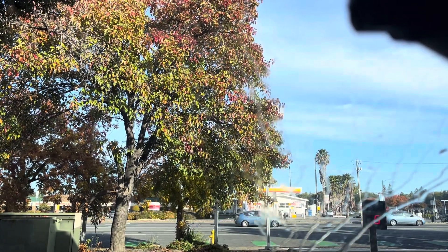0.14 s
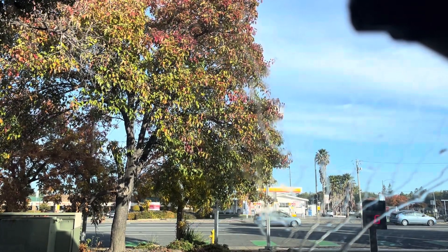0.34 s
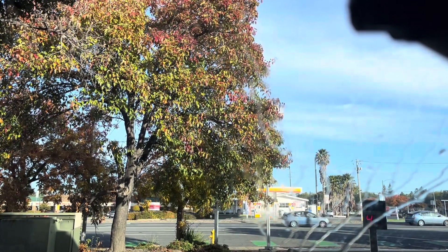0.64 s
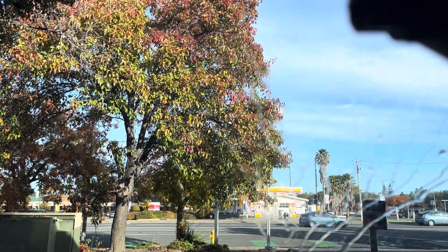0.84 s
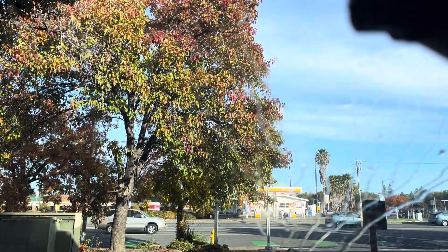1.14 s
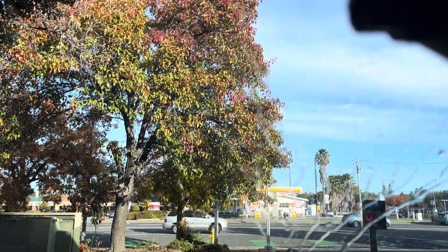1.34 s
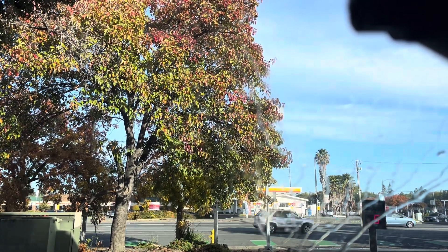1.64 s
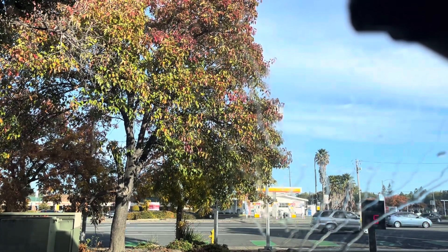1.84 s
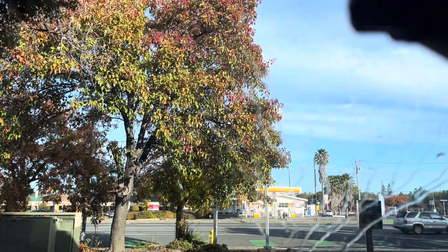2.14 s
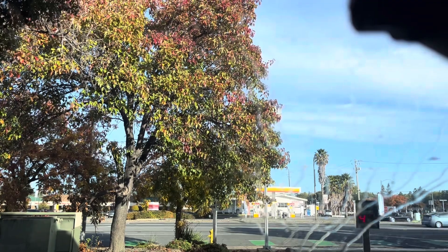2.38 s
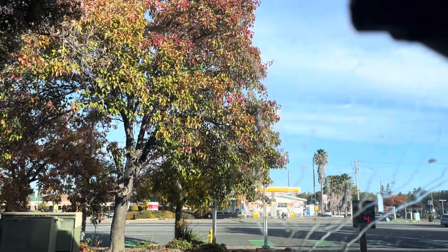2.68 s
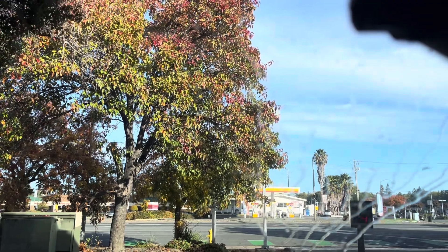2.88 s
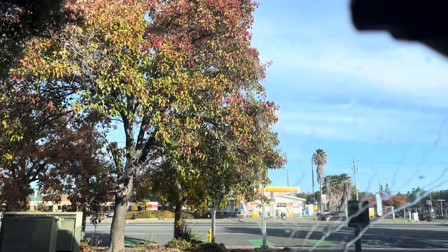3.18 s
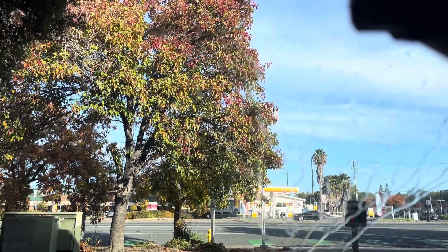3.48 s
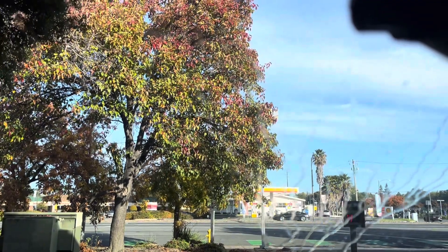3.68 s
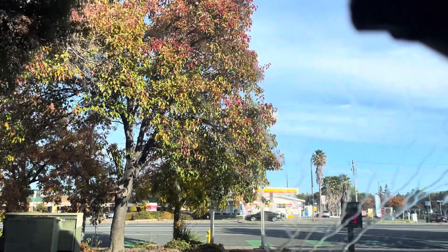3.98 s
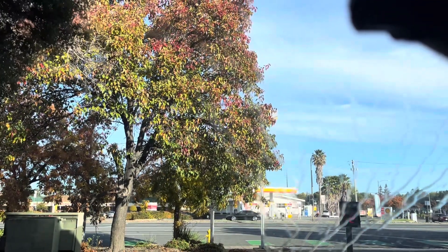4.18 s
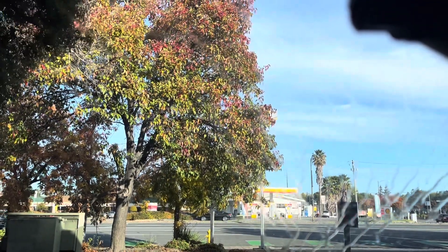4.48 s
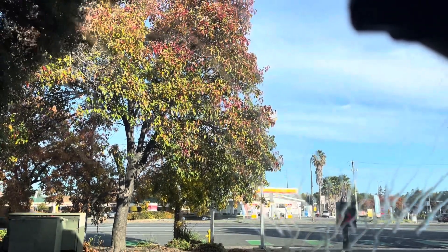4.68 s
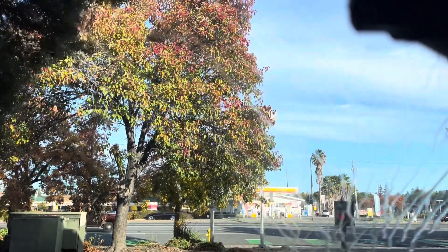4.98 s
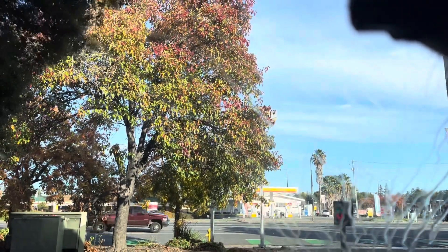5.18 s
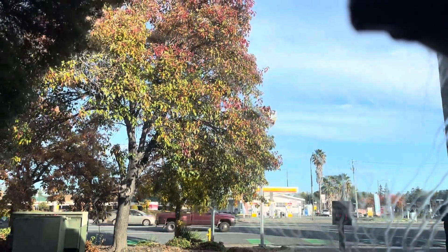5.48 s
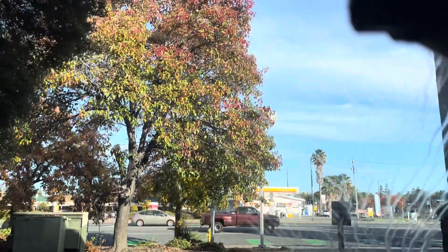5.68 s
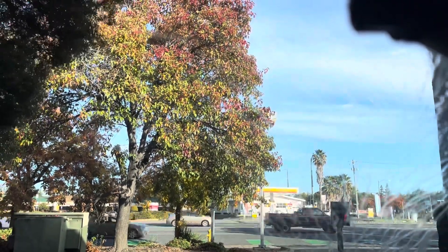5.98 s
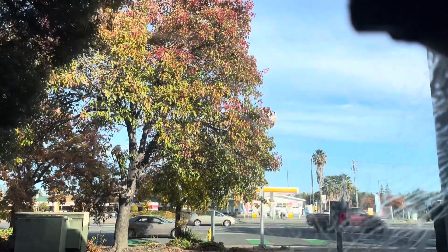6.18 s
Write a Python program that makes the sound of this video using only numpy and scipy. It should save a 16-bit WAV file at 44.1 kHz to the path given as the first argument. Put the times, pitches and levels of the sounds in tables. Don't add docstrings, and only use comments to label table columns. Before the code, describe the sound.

Inside a closed car, heavy dryer blowers drum on the roof with a low roar and rushing air, then move back into a deep cabin boom.

```python
import sys
import numpy as np
from scipy import signal
from scipy.fft import rfft, irfft, next_fast_len
from scipy.io import wavfile

SR = 44100
rng = np.random.default_rng(int(sys.argv[2]) if len(sys.argv) > 2 else 0)


def wav_out(sig):
    wavfile.write(sys.argv[1], SR, np.round(np.clip(np.atleast_2d(sig).T, -1, 1) * 32767).astype(np.int16))


def makeup_ratio(level_db):
    decades = np.asarray(level_db, float) / 20
    return 10 ** decades


N = 279153
SECONDS = np.arange(N) / SR
SIZE = next_fast_len(N)
HZ = np.maximum(np.fft.rfftfreq(SIZE, 1 / SR), 1)


def rms_one(x):
    return x / np.sqrt(np.mean(x ** 2) + 1e-20)


def over_pitch(hz, values):
    return np.interp(np.log(HZ), np.log(hz), values)


def drift(rate_hz):
    step = 40
    pole = np.exp(-2 * np.pi * rate_hz * step / SR)
    noise = rng.standard_normal(N // step + 2002)
    slow = signal.lfilter([1], [1, -2 * pole, pole ** 2], noise)[2000:]
    return np.interp(np.arange(N) / step, np.arange(len(slow)), rms_one(slow))


def by_place(roof_db, behind_db):
    # start_s, place (0 = over the roof, 1 = behind the cabin)
    strike = [
        (0, 0.018),
        (1.0, .15),
        (2.3, 0.2),
        (3.0, 0.33),
        (3.7, .65),
        (4.3, 1.046),
        (5.3, 0.98),
        (6.33, .95),
    ]
    start_s, place = np.transpose(strike)
    return roof_db + (behind_db - roof_db) * np.interp(SECONDS, start_s, place)


def surges():
    # peak_s, boom_db, rear_panels_db
    swells = [
        (2.5, 2.5, 1.5),
        (4.5, 3, 0.5),
        (5.85, 3, 1.8),
        (6.3, 3.5, 2.5),
    ]
    half_width_s = 0.25
    peak_s, *extra_db = np.transpose(swells)
    bells = np.exp(-((SECONDS - peak_s[:, None]) / half_width_s) ** 2)
    return np.dot(extra_db, bells)


def cabin_gain():
    # centre_hz, width_hz, boost_db
    resonances = [(40, 8, 2), (58, 8, 2.5), (73, 9, 2.5), (150, 18, 2.2), (180, 12, 4.5), (207, 12, 3),
                  (250, 22, 2.2), (440, 40, 2.4), (725, 70, 3.2), (1390, 65, 4.2), (2400, 85, 2.4),
                  (2680, 125, 4.2), (2900, 105, 4.2)]
    return makeup_ratio(sum(db / (1 + (2 * (HZ - hz) / width) ** 2) for hz, width, db in resonances))


def at_ports(shared, own_left, own_right):
    # pitch_hz, likeness (0-1), left_lead_rad, left_minus_right_db
    ports = [(45, .995, .03, .3), (100, .9, .25, 1.3), (300, .78, 0., .8), (420, .4, .5, 2.2),
             (560, .15, 2.2, 2.5), (1200, .4, 3.5, .5), (1620, .55, 3.6, -1.5), (1720, .75, 6.7, 3.5),
             (2700, .75, 7.1, 2.2), (3600, .36, 7.4, 4.6), (5100, .4, 7.0, 5.2), (8300, .9, 3.14, 0.),
             (11800, .95, 0., 0.), (15000, .9, -3., 0.)]
    hz, *columns = np.transpose(ports)
    alike, lead, balance_db = [over_pitch(hz, column) for column in columns]
    alike = np.clip(alike, 0, 1)
    together, apart = np.sqrt(alike) * shared, np.sqrt(1 - alike)
    left = together * np.exp(0.5j * lead) + apart * own_left
    right = together * np.exp(-0.5j * lead) + apart * own_right
    return np.array([left * makeup_ratio(balance_db / 2), right * makeup_ratio(-balance_db / 2)])


def turbulence(colour, level_db, gust_db, gust_hz):
    hz, db = np.transpose(colour)
    inside = (HZ > hz[0]) * (HZ < hz[-1])
    path = makeup_ratio(over_pitch(hz, db)) * inside
    white = rfft(rng.standard_normal((3, SIZE)))
    spectrum = at_ports(*white) * path * cabin_gain()
    noise = rms_one(irfft(spectrum, SIZE)[:, :N])
    return noise * makeup_ratio(level_db + gust_db * drift(gust_hz))


def whistles():
    # pitch_hz, width_hz, roof_db, behind_db
    gaps = [
        (731, 16, -54.5, -64),
        (2700, 35, -65.5, -66),
        (2925, 35, -66, -66.5),
        (1400, 28, -71.5, -61),
        (9450, 40, -83, -87.5),
        (9780, 15, -85, -92),
    ]
    out = np.zeros(N)
    for hz, width_hz, roof_db, behind_db in gaps:
        turn = 2 * np.pi * hz * SECONDS
        tone = drift(width_hz) * np.sin(turn) + drift(width_hz) * np.cos(turn)
        out += makeup_ratio(by_place(roof_db, behind_db)) * tone
    return out


def ticks():
    # start_s, peak_db, centre_hz, width_octaves, t60_s
    drops = [
        (.5300, -37, 900, 1.1, .04),
        (.7533, -49, 4800, 1.0, .06),
        (.7533, -57, 10900, .22, .08),
        (2.4559, -49, 12400, .5, .035),
        (2.4559, -59, 6600, .9, .03),
    ]
    pan_db = 2.5
    pan = makeup_ratio([[pan_db / 2], [-pan_db / 2]])
    out, t = np.zeros((2, N)), np.arange(SR // 10) / SR
    for start_s, peak_db, hz, octaves, t60 in drops:
        mid, side = rng.standard_normal((2, len(t)))
        edges_hz = np.clip(hz * 2 ** (np.array([-0.5, 0.5]) * octaves), 20, 0.45 * SR)
        band = signal.butter(2, edges_hz, "band", fs=SR, output="sos")
        burst = signal.sosfilt(band, [mid + 0.4 * side, mid - 0.37 * side])
        i = round(start_s * SR)
        out[:, i:i + len(t)] += rms_one(burst) * makeup_ratio(peak_db - 60 * t / t60) * pan
    return out


def fans():
    fan_hz = [528, 523.7, 526]
    # multiple, level_db
    harmonics = [(1, -51.5), (2, -66), (3, -74)]
    out = np.zeros((2, N))
    for hz in fan_hz:
        turn = 2 * np.pi * hz * SECONDS + 1.3 * drift(2.5)
        for multiple, level_db in harmonics:
            flutter_db = 4.0 * drift(2.5)
            phase = rng.uniform(0, 2 * np.pi, (2, 1))
            out += makeup_ratio(level_db + flutter_db) * np.sin(multiple * turn + phase)
    return out * makeup_ratio(by_place(-5.5, 4))


def spray():
    # pitch_hz, level_db
    colour = [(2000, -80), (2900, -25), (3500, -2), (4000, 0), (5000, -6), (6000, -11), (7000, -14),
              (8300, -17), (9300, -18.5), (11000, -24.5), (13000, -30), (14700, -35), (17000, -60),
              (20000, -90)]
    return turbulence(colour, by_place(-54.5, -57), gust_db=0.3, gust_hz=5)


def hiss():
    # pitch_hz, level_db
    colour = [(800, -81.5), (1250, -26), (1600, -12), (1900, -4), (2400, -4), (3000, -2), (3400, -6.5),
              (3800, -13.5), (4600, -43.5), (6000, -92.5)]
    return turbulence(colour, by_place(-47.5, -46.5), gust_db=0.1, gust_hz=8)


def rush():
    # pitch_hz, level_db
    colour = [(150, -89.5), (240, -27.5), (320, -4.5), (420, -3), (520, -10), (700, -14.5), (900, -20),
              (1200, -24), (1600, -27), (1800, -37), (2300, -60.5), (3200, -100)]
    return turbulence(colour, by_place(-28.5, -33), gust_db=0.3, gust_hz=6)


def rear_panels(surge_db):
    # pitch_hz, level_db
    colour = [(40, -90), (62, -30), (80, -8), (95, -1.5), (120, 0), (138, -1.5), (160, -8), (220, -32),
              (400, -90)]
    return turbulence(colour, by_place(-25, -22) + surge_db, gust_db=0.4, gust_hz=4)


def boom(surge_db):
    # pitch_hz, level_db
    colour = [(12, -70), (22, -32), (31, -18), (40, -4), (55, -.5), (72, 0), (85, -3), (105, -15),
              (150, -46), (220, -90)]
    return turbulence(colour, by_place(-26.5, -24) + surge_db, gust_db=0.4, gust_hz=3)


def roof_drumming():
    # pitch_hz, level_db
    colour = [(70, -90), (105, -31), (135, -6), (155, -3), (200, -1.5), (240, -3.5), (290, -9.5),
              (350, -13), (440, -23.5), (600, -53.5), (900, -100)]
    return turbulence(colour, by_place(-14.5, -24.5), gust_db=0.4, gust_hz=3)


def scene():
    boom_surge_db, rear_surge_db = surges()
    details = whistles() + ticks() + fans()
    air = spray() + hiss() + rush()
    body = rear_panels(rear_surge_db) + boom(boom_surge_db) + roof_drumming()
    return details + air + body


def top_cut(x):
    return signal.sosfilt(signal.butter(12, 15200, fs=SR, output="sos"), x)


def record(dry):
    top = 1.3
    rounded = top * np.tanh(dry / top)
    return top_cut(rounded)


dry = scene()
out = record(dry)
wav_out(out)
```